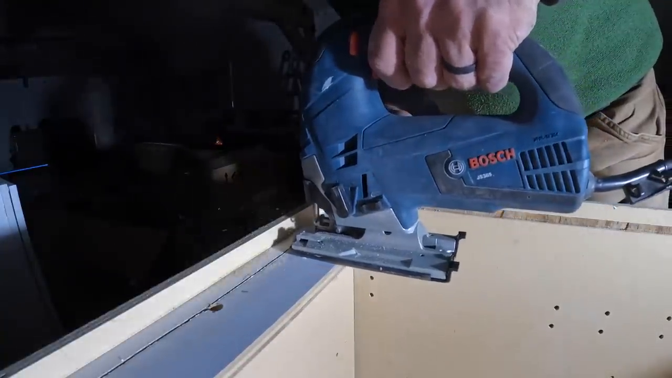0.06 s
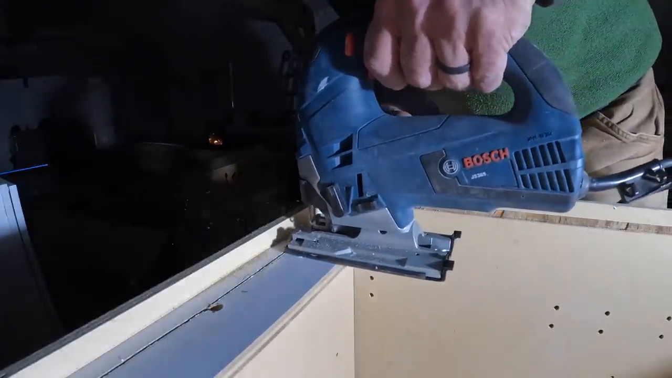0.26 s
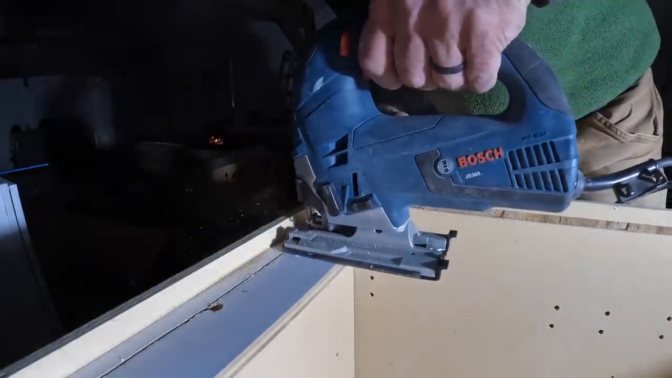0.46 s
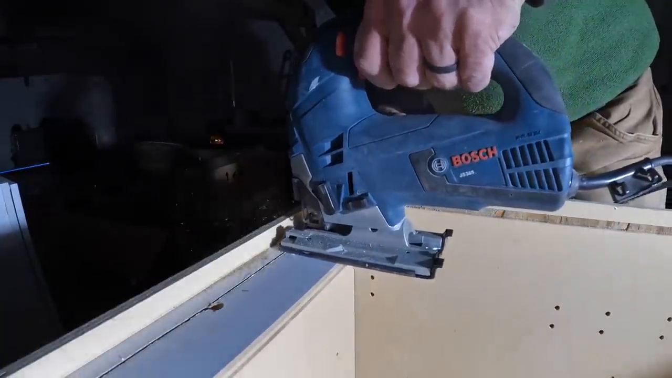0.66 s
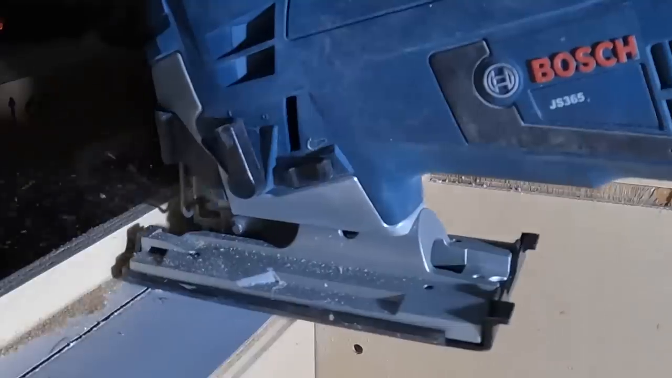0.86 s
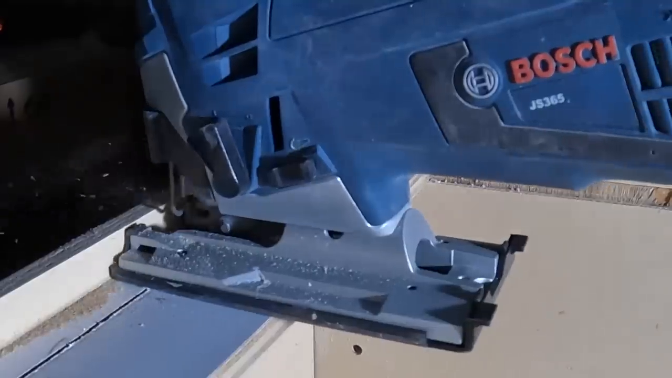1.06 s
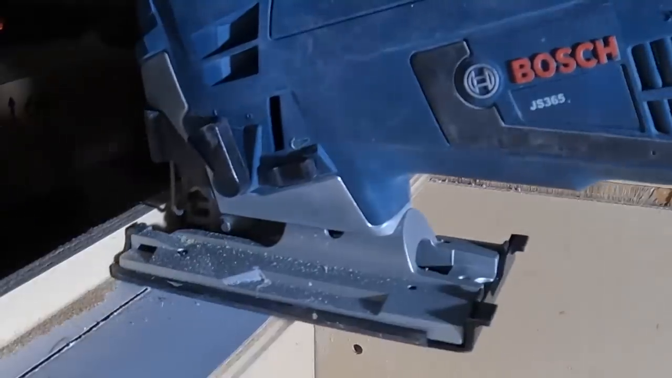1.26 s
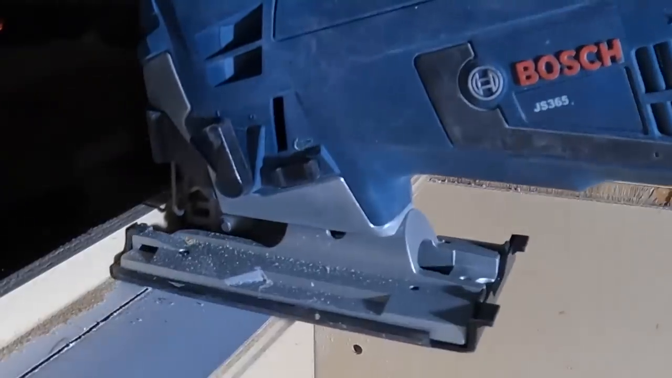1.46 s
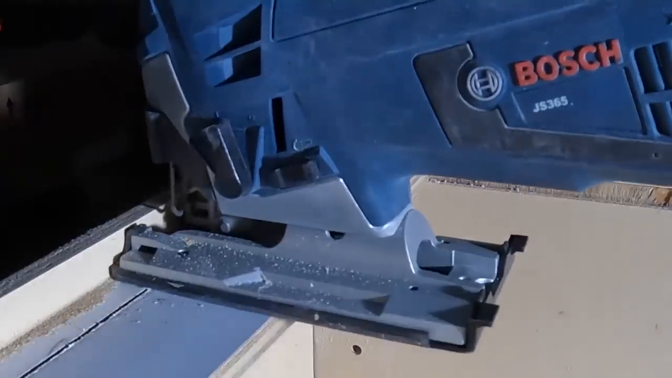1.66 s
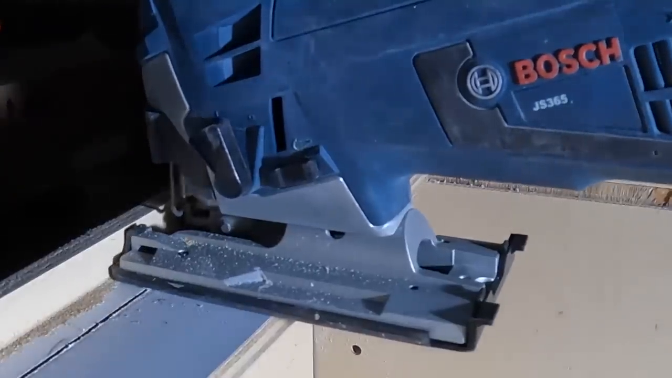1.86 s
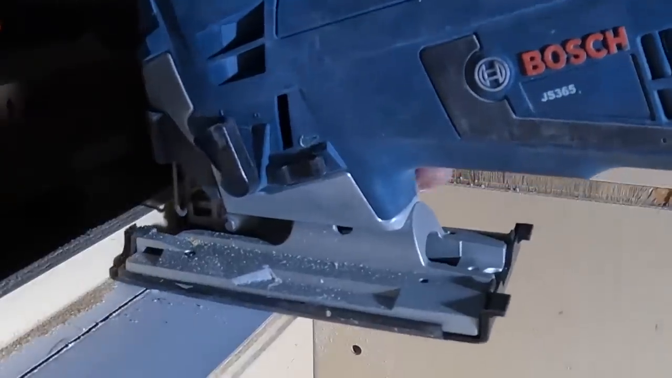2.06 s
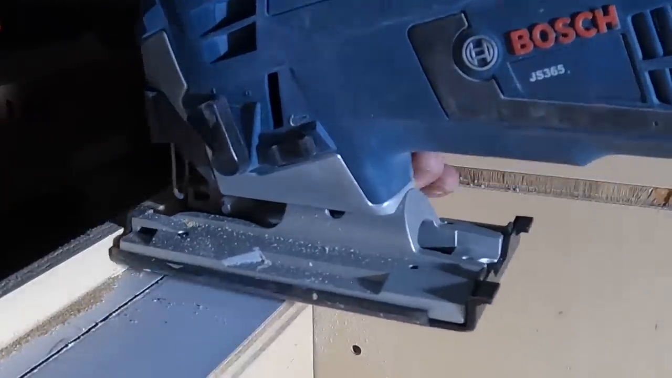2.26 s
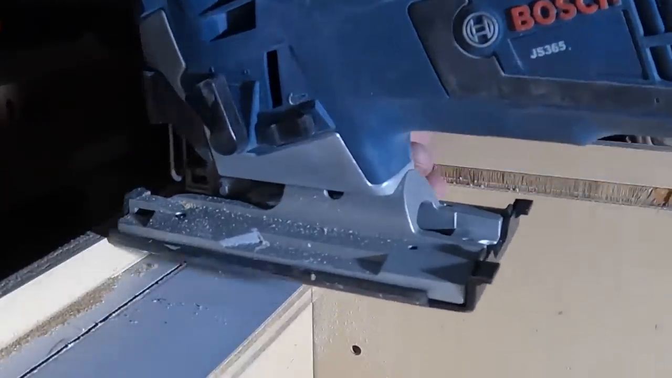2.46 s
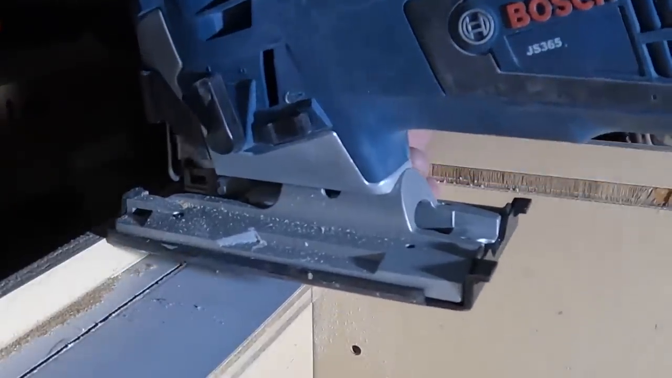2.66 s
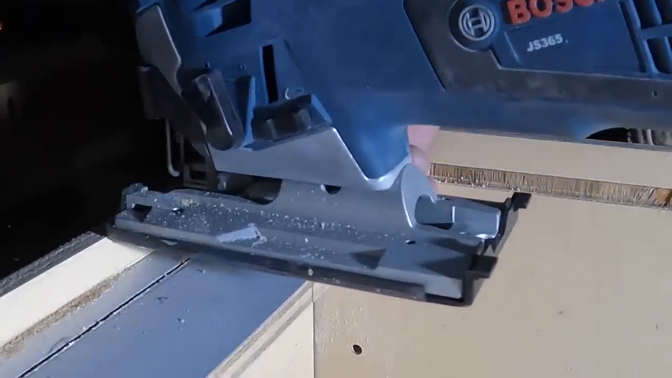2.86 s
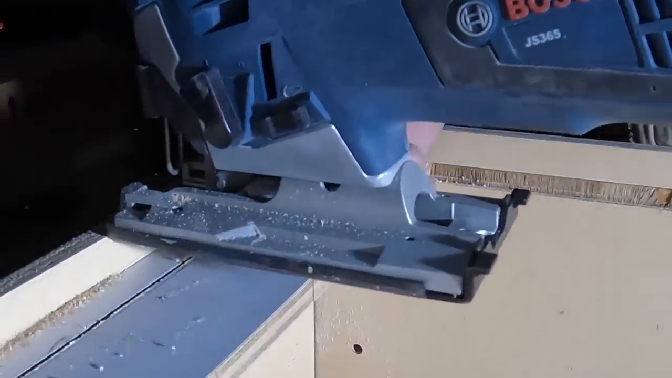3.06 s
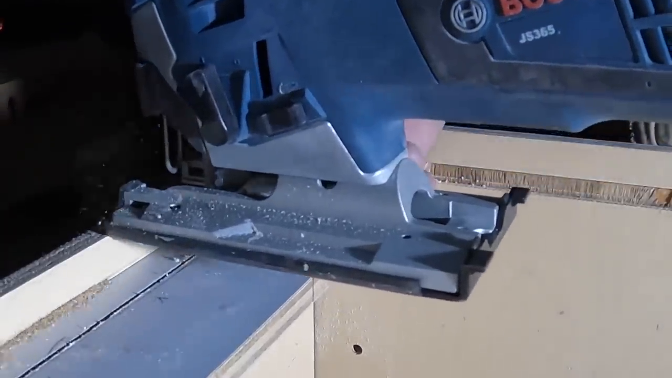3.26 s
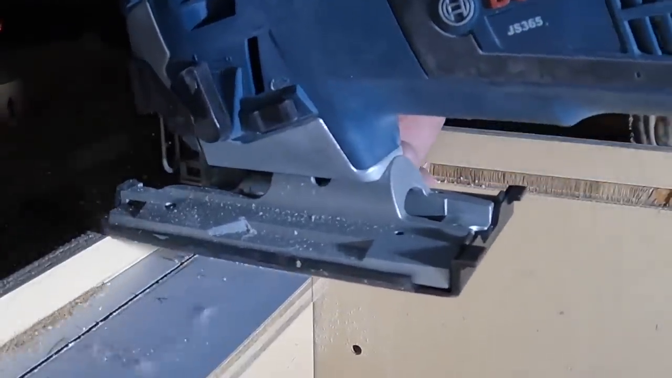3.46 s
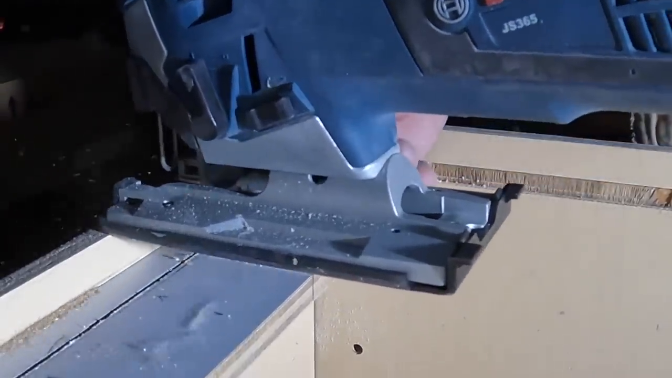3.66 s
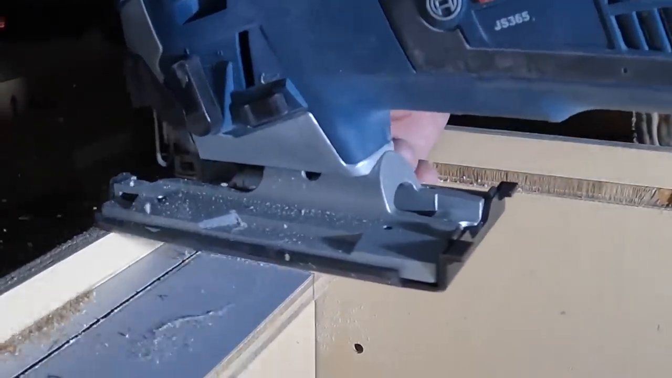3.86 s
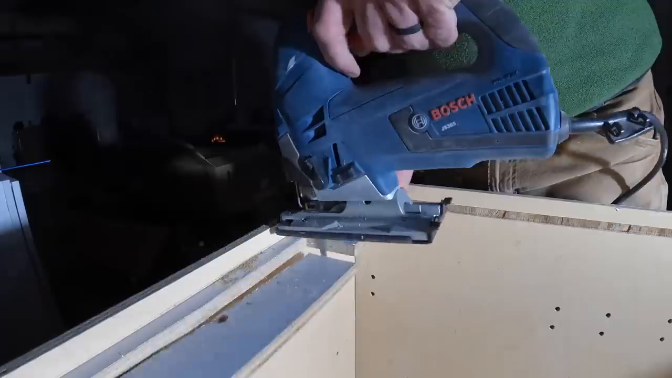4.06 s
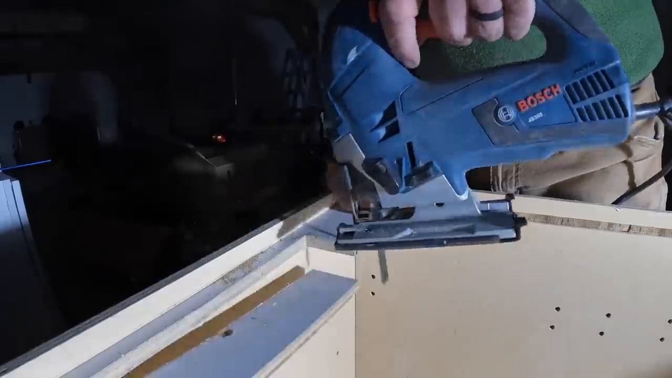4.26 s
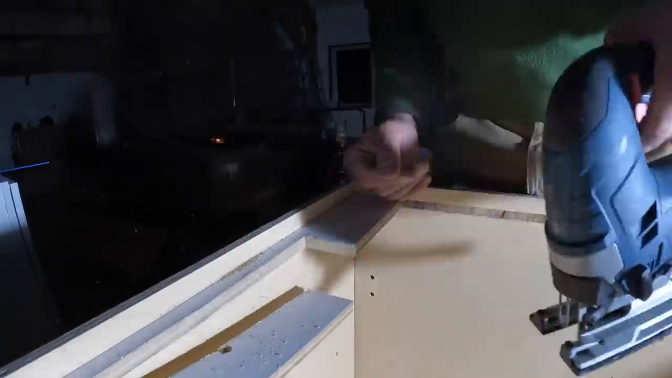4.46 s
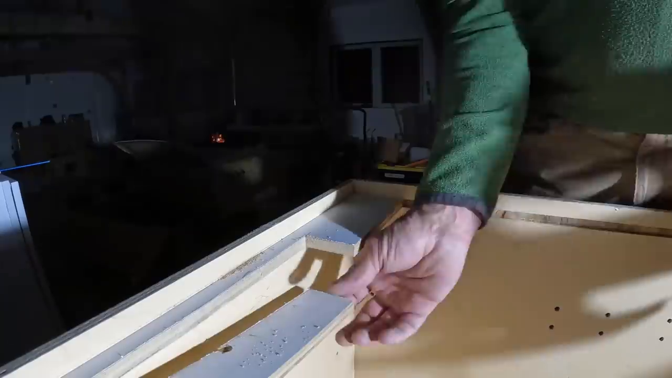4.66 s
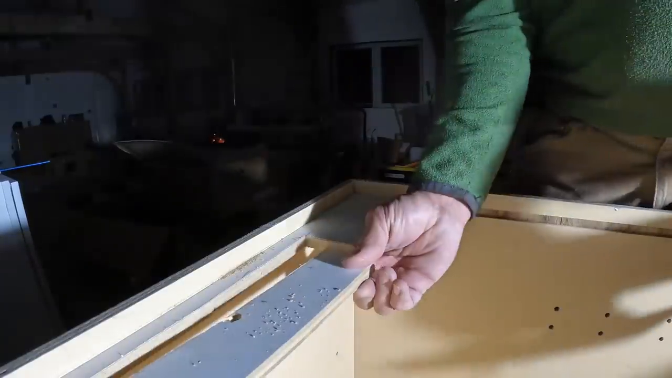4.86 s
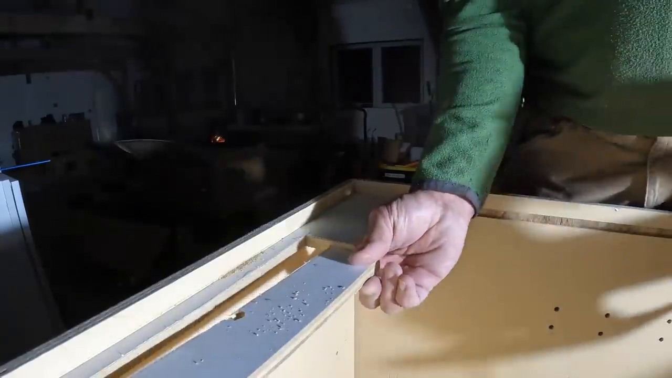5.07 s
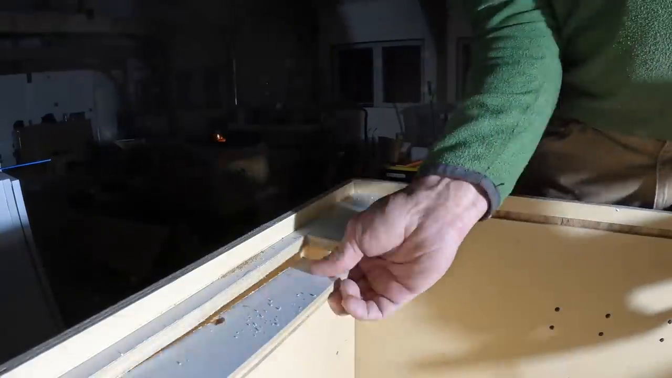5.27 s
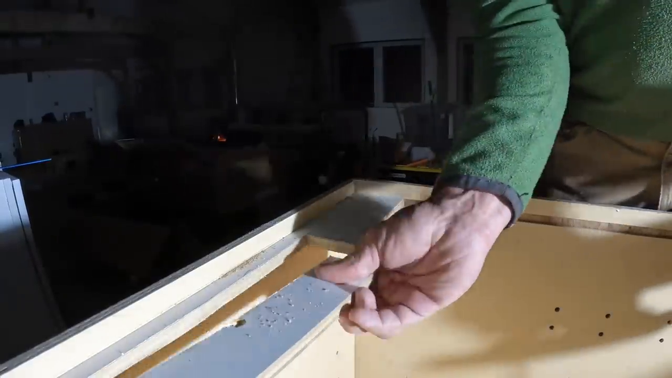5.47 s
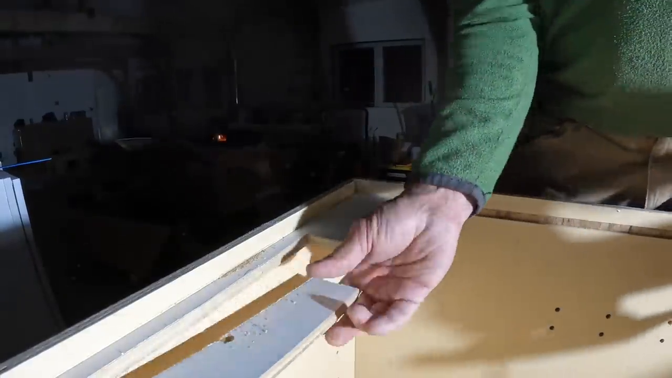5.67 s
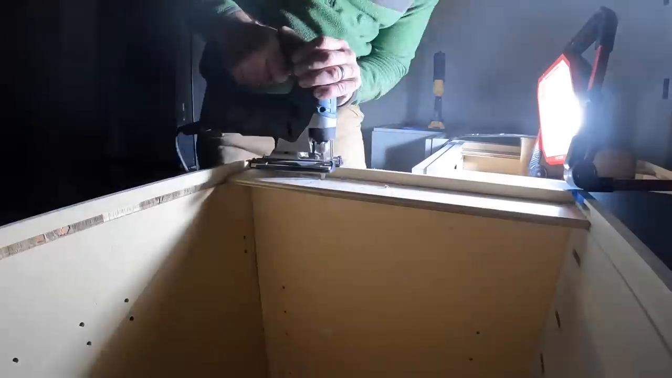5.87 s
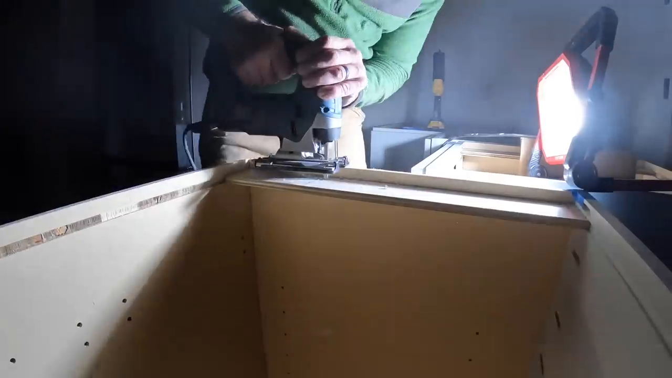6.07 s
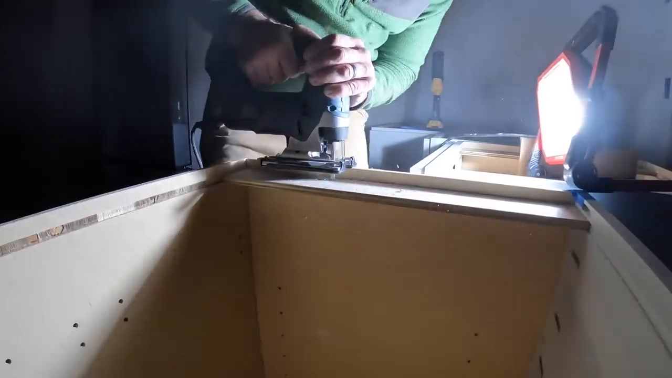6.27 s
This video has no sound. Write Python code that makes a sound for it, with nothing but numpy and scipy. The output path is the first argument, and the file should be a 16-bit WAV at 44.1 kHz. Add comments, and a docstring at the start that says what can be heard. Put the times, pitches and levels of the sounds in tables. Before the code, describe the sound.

A jigsaw buzzes through wood, coasts down, chatters and knocks, then cuts again; wooden taps and slides follow before a squeal launches the fastest cut.

```python
"""Beside a plywood cabinet in a workshop, saw close to a stereo microphone, all in fast motion.
A corded jigsaw is already cutting: strokes thump and rasp, gears whine, and it coasts down on release.
The blade chatters out of the kerf and wood knocks; a second cut binds, frees the offcut and is lifted clear.
Offcut and saw knock and slide on the panels, the metal shoe is set down, and a squeal opens the fastest cut.
Crank-locked lines and noise bursts make the saw; struck modes and shaped noise make the wood and the room."""
import sys
import numpy as np
from scipy import signal
from scipy.fft import rfft, irfft
from scipy.io import wavfile

SR = 44100
rng = np.random.default_rng(int(sys.argv[2]) if len(sys.argv) > 2 else 0)


def waveform_to_disk(signal):
    """Save audio, clipped to [-1, 1], as 16-bit WAV at the path in sys.argv[1]."""
    frames = np.transpose(np.atleast_2d(signal))
    scaled = np.clip(frames, -1, 1) * 32767
    samples = np.round(scaled).astype(np.int16)
    wavfile.write(sys.argv[1], SR, samples)


N = 278712
T = np.arange(N) / SR
HZ = np.fft.rfftfreq(N, 1 / SR)
EDGE_HZ = 15850  # upper band limit
ROTOR_TURNS = 6.2  # rotor turns per blade stroke


def amp(db):
    """Amplitude of a level in dB."""
    return 10 ** (np.asarray(db) / 20)


def unit(x):
    """Scales x to rms 1."""
    return x / np.sqrt(np.mean(x ** 2) + 1e-20)


def read(points, hz):
    """Joins the points of a spectrum by straight lines on a log frequency axis."""
    f, value = np.transpose(points)
    return np.interp(np.log(hz + 0.0015), np.log(f), value)


def curve(rows):
    """Joins (time, value) rows by straight lines."""
    return np.interp(T, *np.transpose(rows))


def bumps(rows):
    """dB over time of brief swells or drops."""
    return sum(db * np.exp(-((T - s) / width) ** 2) for s, width, db in rows)


def resonances(modes, at=HZ):
    """dB of a few broad resonances at the given frequencies."""
    return sum(db / (1 + (2 * (at - hz) / width) ** 2) for hz, width, db in modes)


def band(hz, lo_hz, hi_hz):
    """Gain of a steep band-pass."""
    return 1 / np.sqrt((1 + (lo_hz / (hz + 1)) ** 12) * (1 + (hz / hi_hz) ** 12))


def shaped(x, gain):
    """Filters x by a gain over frequency."""
    return irfft(rfft(x) * gain, N)


def noise(gain):
    """Random noise of the given spectrum, rms 1."""
    return unit(shaped(rng.standard_normal(N), gain))


def wander(hz):
    """Random drift below about the given frequency, rms 1."""
    return noise(np.exp(-(HZ / hz) ** 2))


def add(mix, s, sound):
    """Lays a sound into the mix at s seconds, cut off at the end."""
    part = mix[max(round(s * SR), 0):][:len(sound)]
    part += sound[:len(part)]


# trigger of the first cut: pulled_s, let_go_s, spin_up_s, bite_s, stall_hz (strokes per second)
TRIGGER_1 = (-.5, 1.3, .055, .08, 16)
# blade speed the load allows while the trigger is held: time_s, stroke_hz
SPEED_1 = [(0, 168), (.6, 167.7), (.67, 162.5), (.73, 160.7), (0.799, 165.5), (0.902, 168.3), (1.05, 169.4),
           (1.17, 173.5), (1.28, 175.6)]
# push into the wood, heard in the buzz; only the drop below the highest row counts: time_s, push_db
PUSH_1 = [(0.0, -27), (0.52, -27), (0.774, -28.5), (1.016, -26), (1.146, -36), (1.3, -35)]
# layer levels at full speed and push, before the cut's trim: thump_db, octave_db, twelfth_db,
# linkage_db, whine_db, rattle_db, rasp_db, spray_db
LEVELS_1 = (-27, -38.5, -26.5, -21.5, -32.5, -29.5, -23, -23.5)
# linkage buzz at stroke multiples 4, 5, 6, ..: level_db
BUZZ_1 = [-13.5, -1, -7, 1.5, -9, -8, -18.5, -10.5, -12.5, -8, -3.5, -7.5]
# resonances of the blade gripped by the kerf: pitch_hz, width_hz, level_db
BLADE_1 = [(2450, 180, 4.5), (4180, 1800, 5), (5150, 190, 5.5), (6370, 800, 5.5), (10450, 480, 3)]
# colour of the cutting noise: pitch_hz, density_db (per Hz)
COLOUR_1 = [(200, -7.5), (330, -3.5), (500, -8.5), (650, -8), (1200, -5), (1900, -10), (4300, -2.5),
            (6500, -8), (10500, -8.5), (12000, -11.5), (15800, -12.5)]


def first_cut():
    """The saw is already running in the wood; load varies its speed, then it coasts down."""
    return jigsaw(TRIGGER_1, SPEED_1, PUSH_1, LEVELS_1, BUZZ_1, BLADE_1, COLOUR_1,
                  flutter=0.58, locked=0.53, tone_db=-2.0, noise_db=-2.0)


# trigger of the second cut: pulled_s, let_go_s, spin_up_s, bite_s, stall_hz (strokes per second)
TRIGGER_2 = (2.557, 4.0, .058, .08, 13)
# blade speed the load allows while the trigger is held: time_s, stroke_hz
SPEED_2 = [(2.78, 134.5), (2.834, 144), (2.994, 151.5), (3.146, 164.1), (3.23, 170.8), (3.354, 174),
           (3.75, 174.3), (4.0, 167.7)]
# push into the wood, drop below the highest row: time_s, push_db
PUSH_2 = [(2.85, -33), (3.17, -38.5), (3.506, -30.5), (3.998, -31), (4.06, -43)]
# layer levels before the cut's trim: thump_db, octave_db, twelfth_db, linkage_db, whine_db,
# rattle_db, rasp_db, spray_db
LEVELS_2 = (-25, -35, -30.5, -25, -33, -30, -23, -26)
# linkage buzz at stroke multiples 4, 5, 6, ..: level_db
BUZZ_2 = [-4.5, -3, 0, -14, -12.5, -10, -16, -11.5, -24, -16.5, -26, -26]
# resonances of the blade gripped by the kerf: pitch_hz, width_hz, level_db
BLADE_2 = [(3760, 210, 11.6), (4700, 1100, 6.5), (5760, 860, 7.7), (7730, 340, 7), (10240, 570, 10.2),
           (12100, 440, 11), (14400, 1200, 17)]
# colour of the cutting noise: pitch_hz, density_db (per Hz)
COLOUR_2 = [(200, -3), (270, -0.5), (400, -2), (580, 4), (780, -4.5), (1500, -8.5), (2500, -18.5),
            (4000, -11), (7000, -14), (10500, -11.5), (15800, -16)]
THROUGH_S, PARTING_S = 4.03, 0.086  # the cut frees the offcut: start and duration
LIFT_S, LIFTING_S = 4.3, 0.16  # the saw is lifted clear: start and duration


def second_cut():
    """Parting the offcut and lifting the saw each change the balance of the layers."""
    through = np.clip((T - THROUGH_S) / PARTING_S, 0, 1)
    lifted = np.clip((T - LIFT_S) / LIFTING_S, 0, 1)
    return jigsaw(TRIGGER_2, SPEED_2, PUSH_2, LEVELS_2, BUZZ_2, BLADE_2, COLOUR_2,
                  flutter=0.52, locked=0.65, tone_db=-2.5, noise_db=-2.0,
                  through=through, lifted=lifted)


# trigger of the last cut: pulled_s, let_go_s, spin_up_s, bite_s, stall_hz (strokes per second)
TRIGGER_3 = (5.922, 6.4, .038, .008, 11)
# blade speed the load allows while the trigger is held: time_s, stroke_hz
SPEED_3 = [(6.05, 520), (6.32, 519)]
# push into the wood, steady here: time_s, push_db
PUSH_3 = [(6, -28)]
# layer levels before the cut's trim: thump_db, octave_db, twelfth_db, linkage_db, whine_db,
# rattle_db, rasp_db, spray_db
LEVELS_3 = (-26, -37.5, -25, -29.5, -34, -27.5, -30.5, -21.5)
# linkage buzz at stroke multiples 4, 5, 6, ..: level_db
BUZZ_3 = [-0.5, -22, -5.5, -6, -7, -8, 0, -8.5, -12, -5, -12, -16]
# resonances of the blade gripped by the kerf: pitch_hz, width_hz, level_db
BLADE_3 = [(4870, 250, 6.6), (5420, 190, 11.4), (6760, 280, 5.9), (9910, 240, 19), (11930, 500, 11)]
# colour of the cutting noise: pitch_hz, density_db (per Hz)
COLOUR_3 = [(250, -27), (500, -14.5), (700, -13.5), (1450, -5.5), (1900, -7), (5000, -3), (10500, -15.5),
            (12400, -6.5), (15800, -12)]


def third_cut():
    """The fastest strokes, steady and still running at the end."""
    return jigsaw(TRIGGER_3, SPEED_3, PUSH_3, LEVELS_3, BUZZ_3, BLADE_3, COLOUR_3,
                  flutter=0.42, locked=0.28, tone_db=-1.0, noise_db=-5.0)


# gear whine, one row per stroke multiple, from two strokes below the rotor line upwards: level_db
GEAR = [-12, -11.5, -7.5, -12.5, -18.5, 5.5, -3.5, -13, -8, -22, -46.5, -5]
# resonances of housing and shoe: pitch_hz, width_hz, level_db
HOUSING = [(261.6, 44, 12), (461, 44, 10.5), (902, 44, 11.5), (1317, 140, 3.5), (2340, 83, 3.5),
           (7100, 180, -1.5), (9450, 240, 4)]
# the blade grabs and shakes the panel: time_s, half_width_s, rattle_db (added)
GRABS = [(1.12, 0.043, 1.5), (2.17, 0.12, 8), (2.69, .09, 9.5), (3.99, 0.14, 4.5)]


def jigsaw(trigger, speed, push, levels, buzz, blade, colour, flutter, locked, tone_db, noise_db,
           through=False, lifted=False, jitter=0.001265):
    """One cut: the crank angle times the thump, the gear whine and the bursts of cutting noise."""
    driven, strokes = motor(trigger, speed)
    gains = layer_gains(trigger, driven, strokes, push, levels, through, lifted)
    on = gains.any(0)
    thump, octave, twelfth, linkage, whine, rattle, rasp, spray = gains[:, on]
    hz = (strokes * (1 + jitter * wander(29.8)))[on]
    turns = np.cumsum(hz) / SR

    tones = linkage * partials(turns, np.arange(len(buzz)) + 4, buzz, flutter=0.2)
    for multiple, gain in ((1, thump), (2, octave), (3, twelfth)):
        tones += gain * partials(turns, [multiple], [0], flutter=0.15)
    sidebands = ROTOR_TURNS - 2 + np.arange(len(GEAR))
    gear_db = GEAR + np.interp(sidebands * hz.max(), HZ, resonances(blade))
    tones += amp(3.0) * whine * partials(turns, sidebands, gear_db, flutter=0.29)
    # a higher rotor line and its sidebands sing as they slow through a resonance of the housing
    upper = 4 * ROTOR_TURNS
    singing = np.exp(-((upper * hz - 1440) / 220) ** 2)
    upper_lines = partials(turns, upper + np.arange(-2, 2), [-3.5, -5, 4, -10], flutter=0.77)
    tones += amp(0.3) * rattle * singing * upper_lines

    # noise comes in bursts on the up and down stroke, no two equally strong
    half_strokes = (2 * turns).astype(int)
    force = amp(2.9 * rng.standard_normal(int(2 * turns[-1]) + 1))[half_strokes]
    swing = 0.5 + 0.5 * np.cos(4 * np.pi * (turns - 1 / 4))
    depth = 0.42 + 0.18 * np.exp(-hz / 60)  # slow strokes stand apart
    bursts = unit(1 + (force * swing ** 2 - 0.35) * depth)

    # at speed the teeth bite and ring the blade; when it coasts or grabs only loose scraping is left
    at_speed = np.clip((hz - 105) / 50, 0, 1)
    share = np.clip(locked, 0, 1) * at_speed * amp(-2 * bumps(GRABS))[on]
    teeth = np.zeros(N)
    teeth[on] = tooth_rasp(turns, hz.max(), flutter)
    body = amp(read(colour, HZ) + resonances(HOUSING))
    ring = amp(resonances(blade))
    cutting = rattle * amp(-1.5) * noise(body * band(HZ, 171, 2600))[on]
    for level, lo_hz, hi_hz in ((rasp, 2000, 8750), (spray, 7800, 18500)):
        gain = body * band(HZ, lo_hz, hi_hz)
        loose = np.sqrt(1 - share) * noise(gain)[on]
        biting = np.sqrt(share) * unit(shaped(teeth, gain * ring)[on])
        cutting += level * (loose + biting)
    out = np.zeros(N)
    out[on] = amp(tone_db) * tones + amp(noise_db) * bursts * cutting
    return shaped(out, band(HZ, 92, 20000))


COAST_S, DRAG_HZ = 0.575, 15  # let go, the motor slows by air drag and by steady friction


def motor(trigger, speed):
    """Strokes per second under power, and with the coast-down after the trigger is let go."""
    pulled, let_go, spin_up, _, _ = trigger
    held = np.clip(T, pulled, let_go)
    driven = np.interp(held, *np.transpose(speed)) * (1 - np.exp(-(held - pulled) / spin_up))
    released = np.maximum(T - let_go, 0)
    coasting = (driven + DRAG_HZ) * np.exp(-released / COAST_S) - DRAG_HZ
    return np.maximum(driven, 1), np.maximum(coasting, 1)


# how each layer answers: speed_db (per octave), push_db (per dB of push), through_db, lifted_db (off the wood)
# rows: stroke thump, its octave, its twelfth, linkage buzz, gear whine, panel rattle, rasp, chip spray
RESPONSE = [(28.5, -0.45, -13, -5), (9, 0, -2, -17), (23.5, 1.12, 10, -2), (1, 2.5, 7, -22),
            (8.5, -0.5, -14, -5), (-1.6, -0.01, 1, -24.5), (1.3, 0, -1.5, -2), (1.5, 0, -1.3, -1)]
# a line swells gliding through these resonances of saw and cabinet: pitch_hz, width_hz, level_db
SWELLS = [(276, 54, 18), (455.3, 55, 18.5), (919, 66, 13), (1600, 250, 0)]
# the shoe bounces on the panel twice a stroke: time_s, half_width_s, octave_db (added)
BOUNCES = [(.72, 0.15, 15.5), (1.02, 0.045, 9.5)]
CHOKE_DB_PER_OCTAVE = 45  # the gears stop whining as the load drags the motor down
BOG_DB_PER_OCTAVE = 8  # the teeth rasp less while the motor is dragged down
GRAB_RASP = 0.48  # share of a grab's dB that reaches the rasp
BOUNCE_DRAIN = 0.47  # share of a bounce's dB that the twelfth loses
DYING_HZ = 20.6  # the sound dies over the last strokes per second above a stall


def layer_gains(trigger, driven, hz, push, levels, through, lifted):
    """Layers follow speed, push and contact with the wood; lines swell in the resonances they cross."""
    pulled, _, _, bite, stall_hz = trigger
    octaves = np.log2(hz / hz.max())
    eased = curve(push) - curve(push).max()
    thump, octave, twelfth, linkage, whine, rattle, rasp, spray = (
        db + per_octave * octaves + per_push * eased + through_db * through + lift_db * lifted
        for db, (per_octave, per_push, through_db, lift_db) in zip(levels, RESPONSE))
    octave = octave + resonances(SWELLS, 2 * hz) + bumps(BOUNCES)
    twelfth = twelfth + resonances(SWELLS, 3 * hz) - BOUNCE_DRAIN * bumps(BOUNCES)
    sag = np.log2(hz.max() / driven)  # octaves below top speed while powered
    rasp = rasp + GRAB_RASP * bumps(GRABS) - BOG_DB_PER_OCTAVE * np.minimum(sag, 0.5)
    mesh = ROTOR_TURNS - 2 + np.argmax(GEAR)  # the strongest gear line
    whine = whine + (1 - through) * resonances(SWELLS, mesh * hz) - CHOKE_DB_PER_OCTAVE * sag
    rattle = rattle + bumps(GRABS)
    biting = np.clip((T - pulled) / bite, 0, 1) ** 2
    alive = 1 - np.exp(-np.maximum(hz - stall_hz, 0) / DYING_HZ)
    return biting * alive * amp([thump, octave, twelfth, linkage, whine, rattle, rasp, spray])


# teeth passing the kerf stress lines that glide with the speed: stroke_multiple, width_multiples, level_db
TOOTH_PASSING = [(31.6, 3, 5), (62.6, 3, 6)]


def tooth_rasp(turns, top_hz, flutter):
    """The same teeth scrape by on every stroke: a dense stack of lines of uneven strength."""
    multiples = np.arange(16, EDGE_HZ / top_hz + 1)  # begins above the linkage buzz
    stress = sum(db * np.exp(-((multiples - k) / width) ** 2) for k, width, db in TOOTH_PASSING)
    uneven = 2.2 * rng.standard_normal(len(multiples))
    return partials(turns, multiples, stress + uneven, flutter)


def partials(turns, multiples, dbs, flutter):
    """Lines locked to a turning phase, each fluttering in strength; rms near 1."""
    gains = amp(dbs)
    knots = np.linspace(0, len(turns), len(turns) // 900)
    total = 0
    for multiple, gain in zip(multiples, gains):
        sway = np.interp(np.arange(len(turns)), knots, rng.standard_normal(len(knots)))
        line = np.cos(2 * np.pi * (multiple * turns + rng.random()))
        total = total + gain * (1 + flutter * sway) * line
    return total / np.sqrt(np.sum(gains ** 2) / 2)


# the sound drops out for a few milliseconds: time_s, half_width_s, level_db
DROPOUTS = [(0.763, 0.0032, -17.5), (4.067, 0.0061, -17.5)]


def dropouts():
    """Gain of the very short dropouts."""
    return amp(bumps(DROPOUTS))


# the blade binds and sings in a narrow band: start_s, end_s, pitch_hz, width_hz, level_db
SCREECHES = [(1.33, 2.06, 2440, 320, -34.5), (1.2, 1.85, 4030, 920, -33), (2.72, 3.3, 14500, 550, -29.5),
             (2.6, 2.95, 2360, 1000, -36)]


def screeches():
    """Narrow hissing bands that swell and fade as the blade binds."""
    out = np.zeros(N)
    for start, end, hz, width, db in SCREECHES:
        count = int((end - start) * SR)
        hiss = noise(1 / (1 + ((HZ - hz) / width * 2) ** 2))[:count]
        add(out, start, amp(db) * signal.windows.tukey(count, 0.5) * hiss)
    return out


# blade chatter, and in the last row a squeak of the shoe: start_s, length_s, start_hz, end_hz, level_db
HOOTS = [(2.075, 0.029, 890, 920, -20), (2.102, 0.041, 973, 906, -23), (2.716, 0.04, 401, 444, -23),
         (4.074, 0.046, 267, 258, -23), (4.079, 0.032, 530, 616, -22), (4.128, .03, 565, 600, -28),
         (4.183, 0.0485, 520, 645, -17.5), (4.233, 0.036, 542, 634, -19.5), (4.271, 0.038, 542, 661, -20),
         (5.743, 0.037, 1720, 1940, -34)]


def chatter_and_squeak():
    """Blade or shoe sticks and slips: short gliding hoots and a squeak, most of them rising."""
    out = np.zeros(N)
    for s, length, start_hz, end_hz, db in HOOTS:
        count = int(length * SR)
        glide = np.linspace(start_hz, end_hz, count) * (1 + 0.036 * wander(250)[:count])
        turns = np.cumsum(glide) / SR
        hoot = partials(turns, [1, 2, 3], [0, -22, -20], flutter=0)
        add(out, s, amp(db) * signal.windows.tukey(count, 0.8) * hoot)
    return out


def start_squeal(s=5.927, length=0.055, hz=1441, db=-20, overtone_db=-17):
    """The blade squeals as the last cut starts: a tone and a decaying line two octaves above."""
    t = np.arange(int(length * SR)) / SR
    overtone = np.exp(-t / 0.11) * np.sin(2 * np.pi * hz * 4 * t)
    squeal = np.sin(2 * np.pi * hz * t) + amp(overtone_db) * overtone
    out = np.zeros(N)
    add(out, s, amp(db) * unit(squeal) * signal.windows.tukey(len(t), 0.25))
    return out


def ringing(modes, t):
    """Modes struck at a random spot, each decaying by 60 dB in its own time."""
    total = 0
    for hz, db, t60 in modes:
        level = amp(db + 2 * rng.standard_normal() - 60 * t / t60)
        total = total + level * np.sin(2 * np.pi * (hz * t + rng.random() / 2))
    return total


def dying(x, ring):
    """Lets each band of x die at its own speed."""
    hz, t, z = signal.stft(x, SR, nperseg=128)
    decay = amp(-60 * t / read(ring, hz)[:, None])
    return signal.istft(z * decay, SR, nperseg=128)[1][..., :x.shape[-1]]


# wooden knocks: start_s, boom_db, clack_db, tick_db
KNOCKS = [(2.264, -16.5, -39, -39), (2.427, -35.5, -57, -66), (2.457, -35.5, -47.5, -59),
          (2.573, -32, -45, -36.5), (2.612, -21, -30, -36), (2.7, -21, -47, -40), (2.74, -22, -39, -40),
          (3.956, -24.5, -31, -30), (4.307, -31, -38, -30), (4.727, -28, -55, -53),
          (4.772, -40, -34.5, -29), (4.8, -30, -41, -46), (4.855, -32, -37.5, -32.5),
          (5.057, -44, -48, -42.5), (5.137, -46, -47, -49), (5.157, -20, -27.5, -33.5),
          (5.175, -26, -65, -63), (5.257, -27, -40, -50), (5.279, -20.5, -32, -48), (5.301, -34, -38, -50),
          (5.377, -26.5, -42, -47), (5.409, -35, -41, -52), (5.465, -15, -20, -24.5),
          (5.482, -25, -28, -39), (5.505, -30, -30, -46), (5.558, -23.5, -27.5, -44.5),
          (5.586, -53, -30.5, -59), (5.625, -18, -26.5, -43), (5.834, -48, -49, -47.5)]
# cabinet panel modes: pitch_hz, level_db, t60_s
PANEL = [(164.7, -9, 0.25), (219, 3.5, 0.055), (251.3, 3, .23), (300, -1.5, 0.11), (363.6, -4.5, 0.17),
         (453, -4, 0.11), (603, -13, 0.15)]
# colour of a knock: pitch_hz, density_db (per Hz)
KNOCK_COLOUR = [(500, -3), (920, 12.5), (1300, 6.5), (2000, 0.5), (2700, -6), (3200, -11.5), (3800, -6),
                (5500, -13), (9000, -13), (16000, -16.5)]
# ring of a knock: pitch_hz, t60_s
KNOCK_RING = [(700, 0.11), (1500, 0.065), (4000, 0.06), (15000, 0.022)]
# the metal shoe set down: start_s, level_db
SHOE_TAPS = [(5.733, -47), (5.761, -46), (5.78, -21)]
# modes of the shoe: pitch_hz, level_db, t60_s
SHOE = [(466, 2.5, 0.045), (568, 2, 0.062), (734, 11, 0.027), (921, -12, 0.069), (1430, -4, 0.048),
        (1780, -2, 0.025)]


def knocks(size=16384, count=900):
    """Blows boom in the panel, clack in the offcut and tick at the contact; the shoe clanks."""
    out, t, hz = np.zeros(N), np.arange(size) / SR, np.fft.rfftfreq(size, 1 / SR)
    attack = 1 - np.exp(-t / 0.0019)
    grain = rng.standard_normal(size)  # the dense modes of the wood, shared by all blows
    for s, boom_db, clack_db, tick_db in KNOCKS:
        crack = rfft(grain + rng.standard_normal(size)) * amp(read(KNOCK_COLOUR, hz))
        boom = ringing(PANEL, t)
        clack = dying(irfft(crack * band(hz, 660, 1910)), KNOCK_RING)
        tick = dying(irfft(crack * band(hz, 2590, 19400)), KNOCK_RING)
        for part, db in ((boom, boom_db), (clack, clack_db), (tick, tick_db)):
            add(out, s, amp(db) * attack * part / np.std(part[:count]))
    for s, db in SHOE_TAPS:
        contact = 0.25 * np.exp(-t / 0.003) * rng.standard_normal(size)
        clank = attack * (ringing(SHOE, t) + contact)
        add(out, s, amp(db) * clank / np.std(clank[:count]))
    return out


# wood sliding on wood: time_s (at the fastest), swell_s (rise and fade), level_db
SLIDES = [(2.377, 0.015, -44), (4.95, 0.14, -52), (5.27, 0.017, -42), (5.361, .012, -33), (5.4, .16, -54),
          (5.53, .025, -42.5), (5.774, .014, -30.5), (5.86, 0.022, -49)]


def sliding():
    """Wood slides on wood: noise in the knock's colour, made grainy by random strength."""
    grains = unit(amp(3.3 * wander(160)))
    slide = noise(amp(read(KNOCK_COLOUR, HZ)) * band(HZ, 220, 15000)) * grains
    return slide * sum(amp(db) * np.exp(-abs(T - s) / swell) for s, swell, db in SLIDES)


# the cabinet rocks under the saw or the hand: start_s, length_s, level_db
ROCKING = [(0, 2, -63), (1.8, .5, -64), (2.7, 1.84, -58), (4.713, 0.052, -41), (4.851, .28, -49.5),
           (5.133, .03, -28.5), (5.274, .37, -41), (5.9, .45, -53)]
ROCK_RISE_S, ROCK_FALL_S = 0.065, 0.091


def rocking():
    """Low noise of the rocking cabinet, stronger on the right."""
    colour = [(20, -25.5), (48, 2.5), (75, -7.0), (115, -5.5), (180, -4), (400, -52.0)]
    strength = 0
    for s, length, db in ROCKING:
        rise = np.clip((T - s) / ROCK_RISE_S, 0, 1)
        fall = np.exp(-np.maximum(T - s - length, 0) / ROCK_FALL_S)
        strength = strength + amp(db) * rise * fall
    return strength * noise(amp(read(colour, HZ))) * amp([[-5.], [0.]])


def stereo(dry):
    """A faint stereo side part: the sound delayed and coloured, opposite in left and right."""
    side_db = [(150, -38), (500, -45), (1100, -9.5), (1800, -18.5), (2600, -41), (5000, -40.0),
               (9000, -10.5), (15000, -15.5)]
    delay = np.exp(-2j * np.pi * HZ * 0.0011)
    side = shaped(dry, amp(read(side_db, HZ)) * delay)
    return np.array([dry + side, dry - side]) * amp([[-0.5], [0.]])


def workshop(x, size=22050):
    """A short tail of scattered reflections, different at each ear."""
    scattered = rng.random((2, size)) < 0.06
    taps = rng.standard_normal((2, size)) * scattered * (np.arange(size) > 150)
    tail = dying(taps, [(200, 0.36), (1500, 0.043), (6000, 0.033), (15000, 0.27)])  # Hz, t60 in s
    return signal.fftconvolve(x[None], tail / np.linalg.norm(tail[0]), axes=1)[:, :N]


# workshop air: pitch_hz, density_db (per Hz)
FLOOR = [(20, -14.5), (60, -30), (300, 5.5), (1000, -2), (4000, -17), (16000, -26.5)]


def workshop_air():
    """Faint steady noise of the room, alike on both sides."""
    return amp(-61.0) * noise(amp(read(FLOOR, HZ)))


def scene():
    """Saw, blade cries and knocks in stereo, over handling, room tail and air."""
    saw = (first_cut() + second_cut() + third_cut()) * dropouts()
    dry = saw + screeches() + chatter_and_squeak() + start_squeal() + knocks()
    room = workshop(shaped(dry, band(HZ, 340, 18000)))
    handling = sliding() + rocking()
    return stereo(dry) + handling + amp(-13.5) * room + workshop_air()


def record(dry):
    """The band limit: a steep low-pass."""
    low_pass = signal.firwin(401, EDGE_HZ, window=("kaiser", 8), fs=SR)
    return signal.oaconvolve(dry, low_pass[None], "same")


dry = scene()
out = record(dry)
waveform_to_disk(out)
```